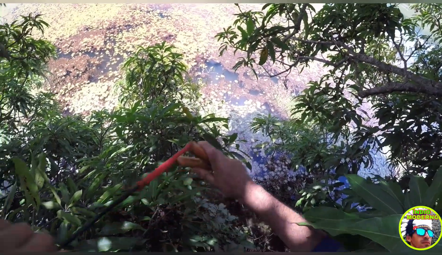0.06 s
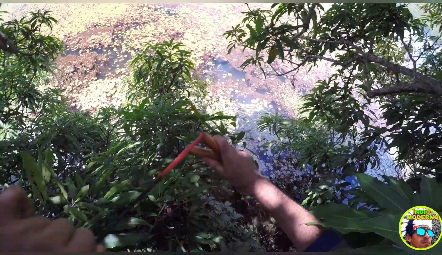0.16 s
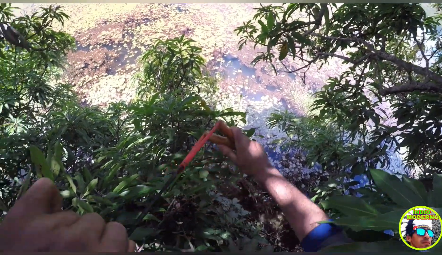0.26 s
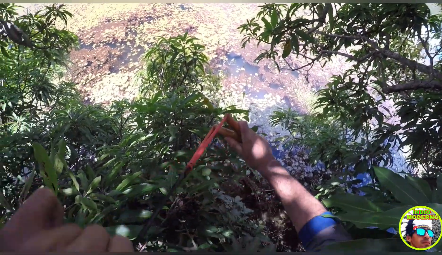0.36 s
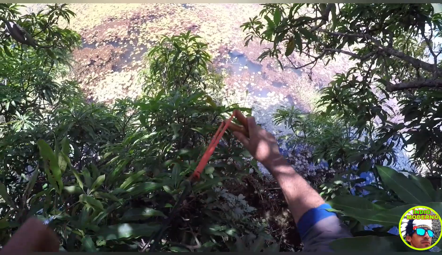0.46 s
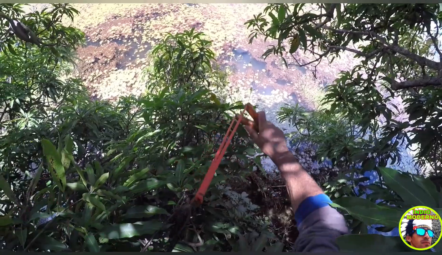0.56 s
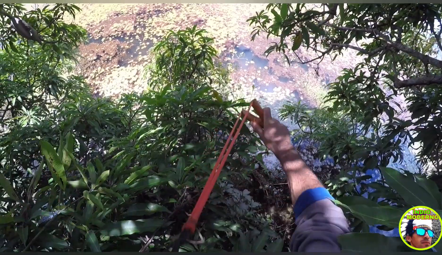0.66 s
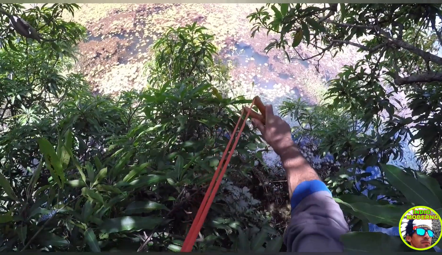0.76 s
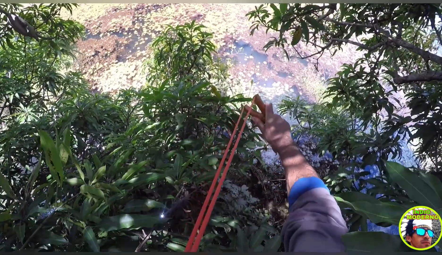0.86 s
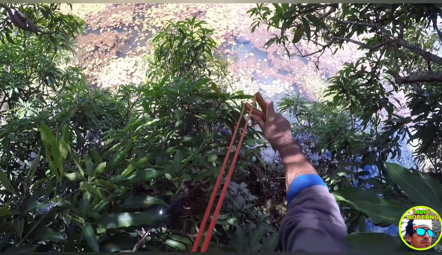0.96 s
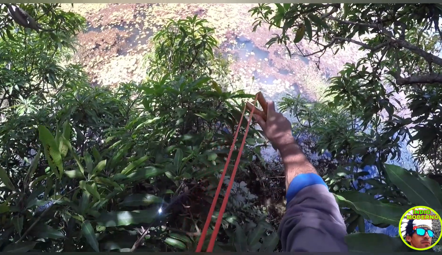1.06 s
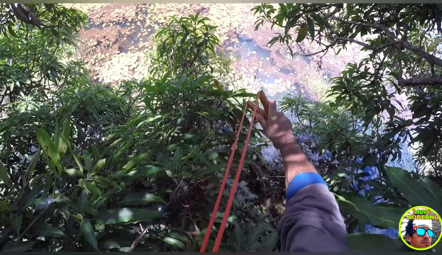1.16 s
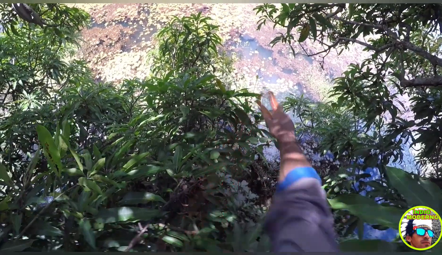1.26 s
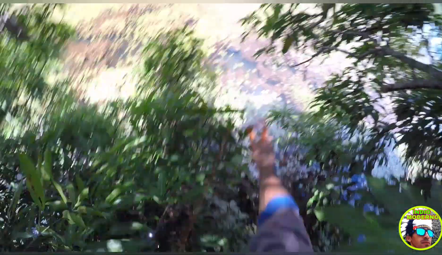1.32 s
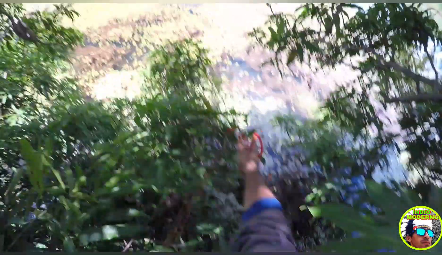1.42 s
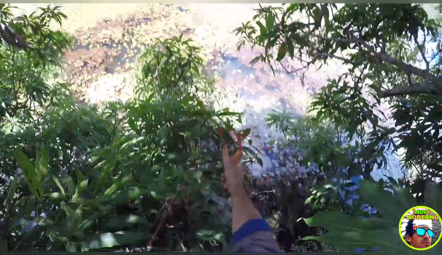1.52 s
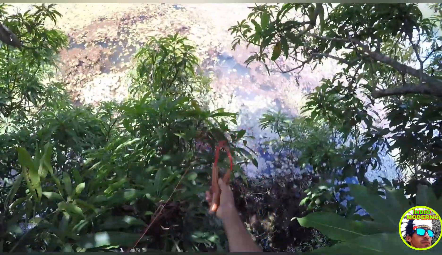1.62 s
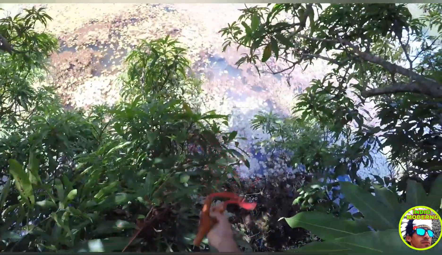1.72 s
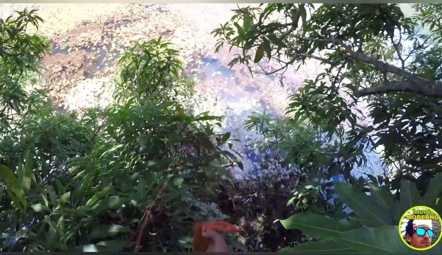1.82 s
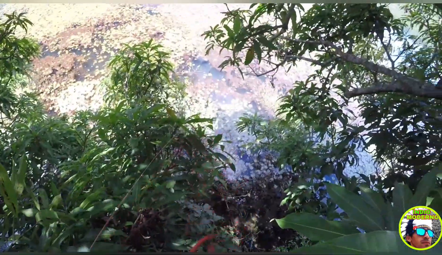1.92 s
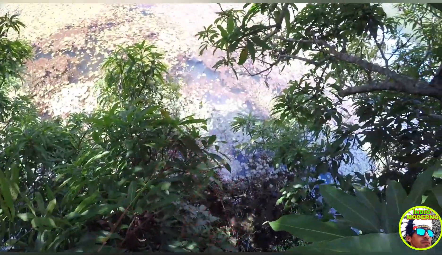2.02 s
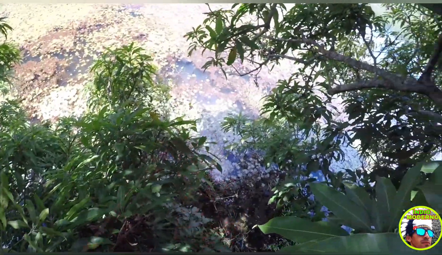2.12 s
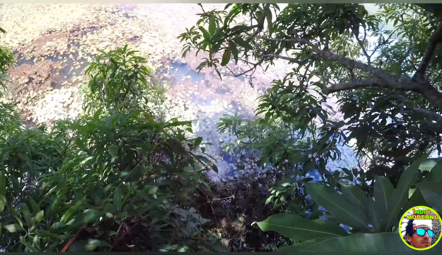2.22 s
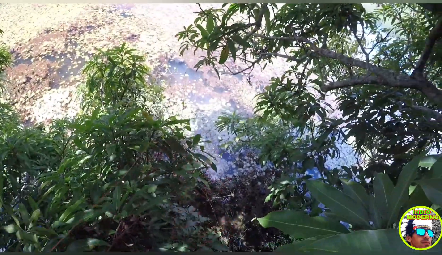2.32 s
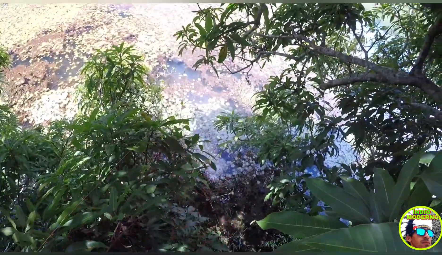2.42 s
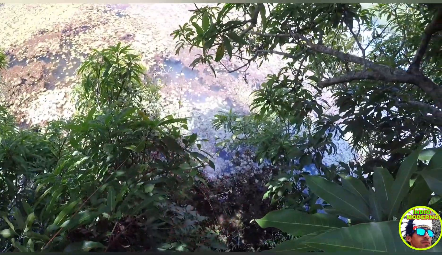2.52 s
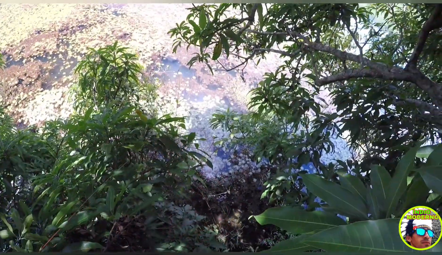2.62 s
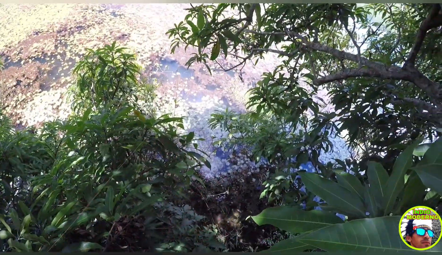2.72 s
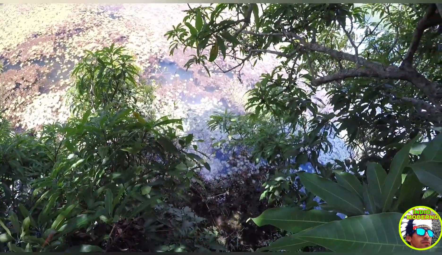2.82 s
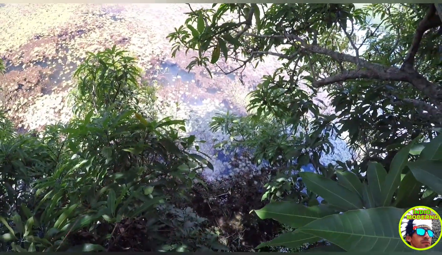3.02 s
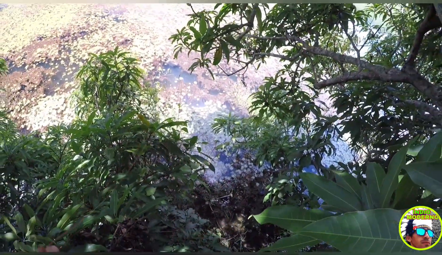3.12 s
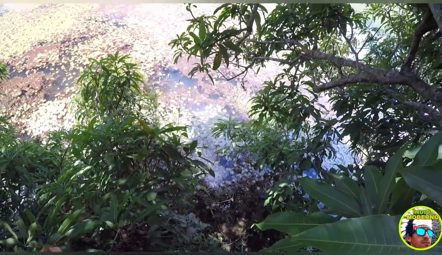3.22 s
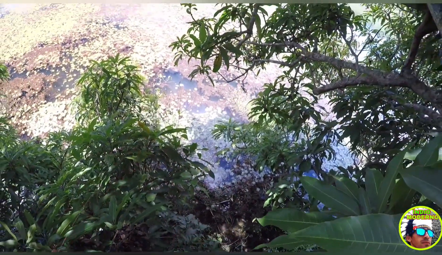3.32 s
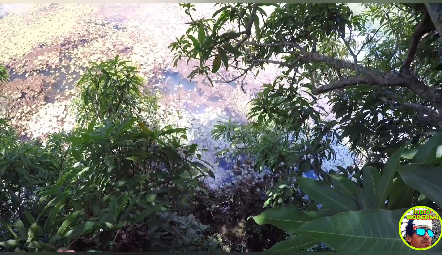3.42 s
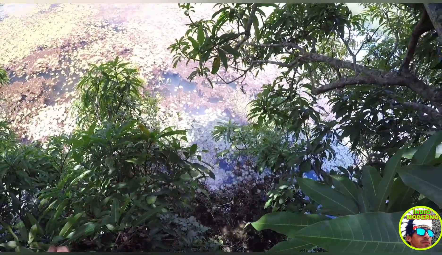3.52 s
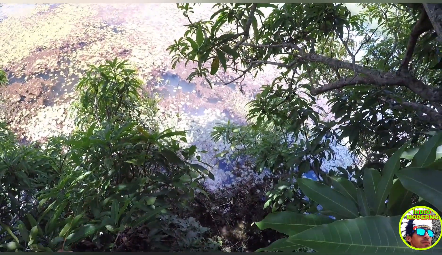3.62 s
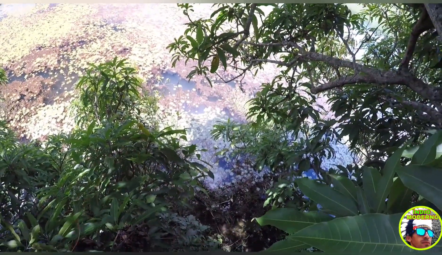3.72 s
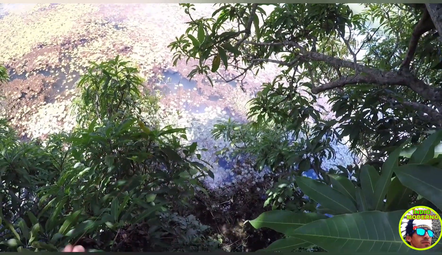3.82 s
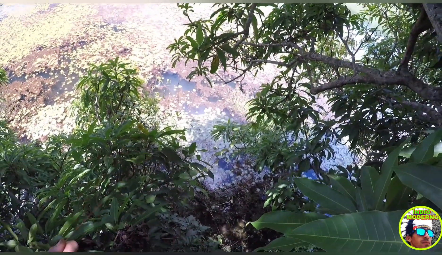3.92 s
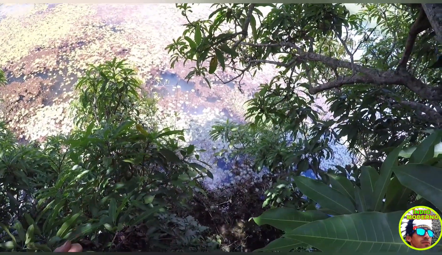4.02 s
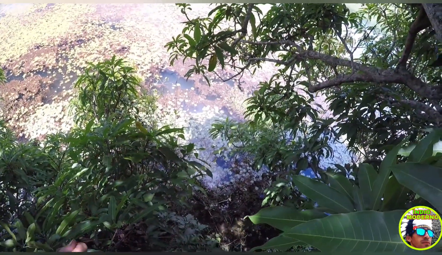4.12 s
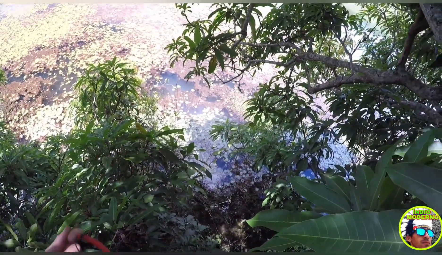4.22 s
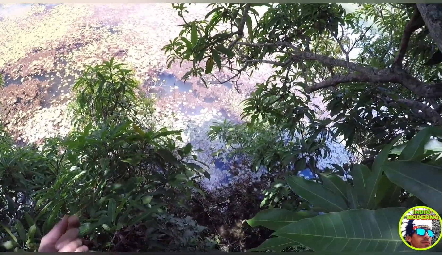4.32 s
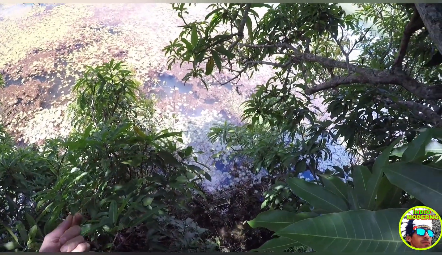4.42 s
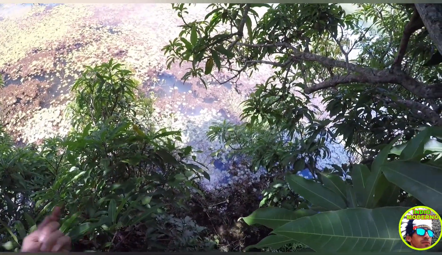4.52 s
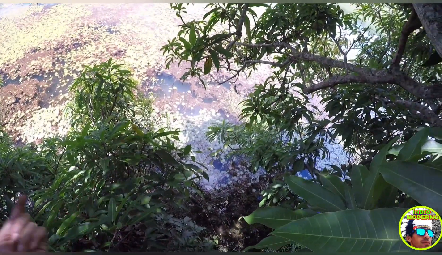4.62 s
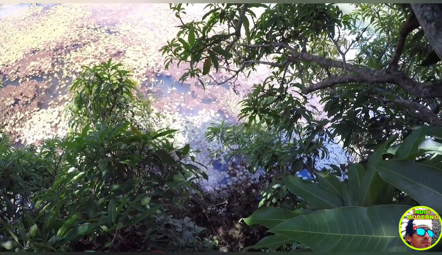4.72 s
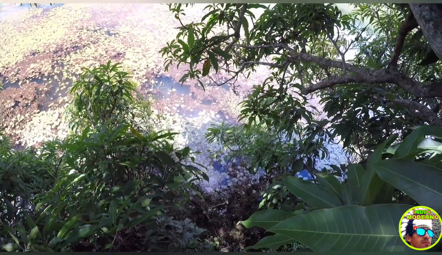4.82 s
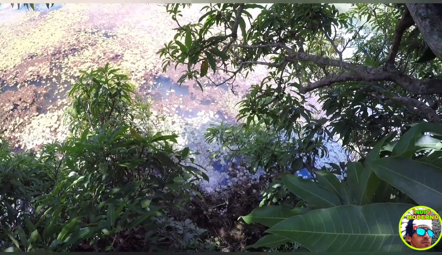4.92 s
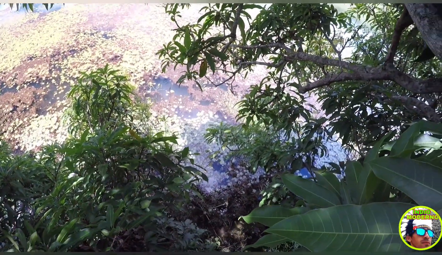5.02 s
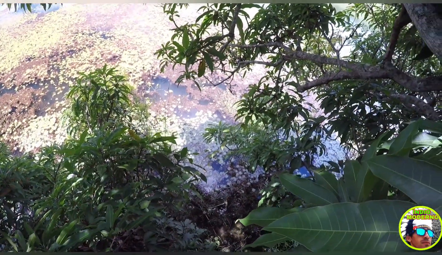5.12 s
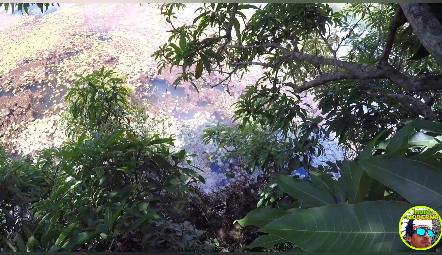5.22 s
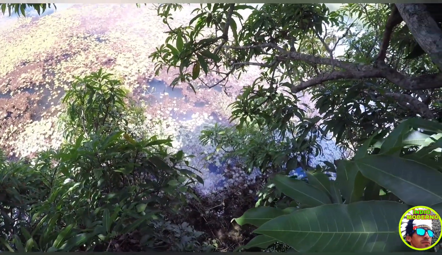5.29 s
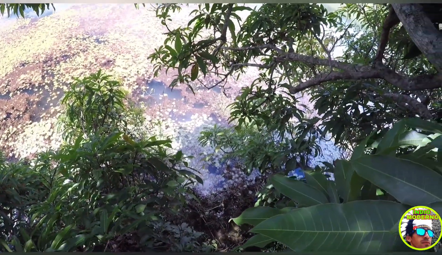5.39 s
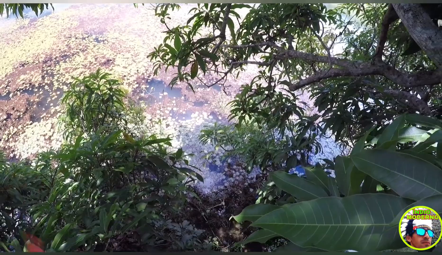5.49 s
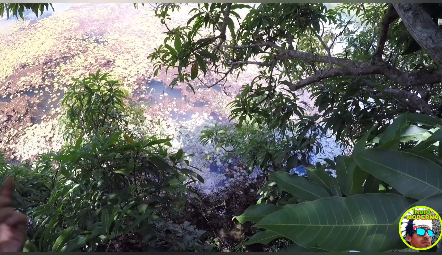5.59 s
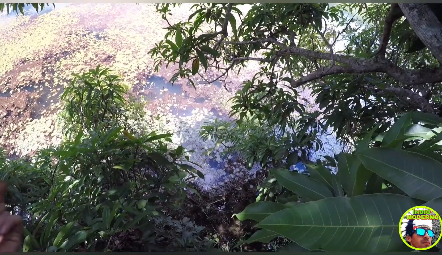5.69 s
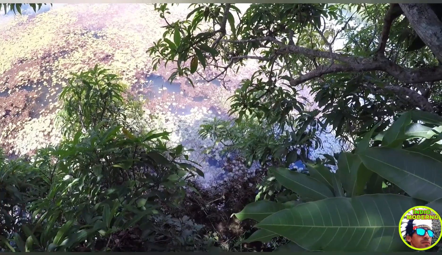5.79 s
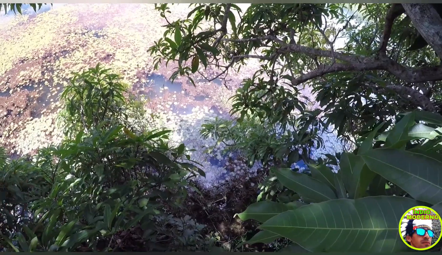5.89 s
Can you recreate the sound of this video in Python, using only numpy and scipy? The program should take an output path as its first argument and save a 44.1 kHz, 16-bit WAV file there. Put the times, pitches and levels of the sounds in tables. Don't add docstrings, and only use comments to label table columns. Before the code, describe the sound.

A near-silent pondside thicket: steady faint hiss, low wind rumble on a small head-worn microphone, a thin high insect band, tiny distant bird whistles and a far dove's soft falling coo at the start. At about 1.25 s a slingshot is released right beside it: a short rubbery rasp and hard ticks, then two violent slaps at 1.36 and 1.40 s, clipping, with deep mount jolts and a brief strap buzz, gone by 1.6 s. Sparse twiggy ticks come from 1.8 s, a brighter one at 2.16 s, with faint finger strokes. From 3.0 to 4.7 s fingers close by tap, pat, catch and rub hollow plastic, pouch and strap with buckle clicks, densest around 3.1-3.9 and 4.1-4.5 s; piercing near chirps sound around 3.0-3.3, 3.9, 4.05 and 4.6 s. Insects swell and a long low coo sounds near 4 s. After a lull, a final handling burst runs 5.35-5.75 s.

```python
import sys
import numpy as np
from scipy import signal
from scipy.io import wavfile
from scipy.ndimage import uniform_filter1d

SR = 44100
rng = np.random.default_rng(int(sys.argv[2]) if len(sys.argv) > 2 else 0)


def nominal_scale(level):
    x = np.asarray(level, float) / 20
    return 10 ** x


def materialize(psi):
    bounded = np.clip(np.atleast_2d(psi).T, -1, 1)
    quanta = np.round(bounded * 32767).astype(np.int16)
    wavfile.write(sys.argv[1], SR, quanta)


N = 262395

# f/Hz, width/Hz, level/dB
SHELL = [(1034, 170, 3), (1499, 1000, -8), (2500, 450, -13), (2907, 170, -6), (4020, 370, -8),
         (5125, 110, -3.5)]
# f/Hz, width/Hz, level/dB
HARD_PARTS = [(6300, 1200, 0.5), (7440, 900, 1), (8800, 900, -5), (11170, 500, -6), (13600, 600, -7),
              (14500, 800, -9.5)]


def evened(x):
    return x / np.sqrt(np.mean(x ** 2) + 1e-20)


def peaked(x):
    return x / abs(x).max()


def add(mix, s, sound):
    part = mix[round(s * SR):][:len(sound)]
    part += sound[:len(part)]


def resonate(x, hz, width):
    return signal.lfilter(*signal.iirpeak(min(hz, .45 * SR), hz / width, SR), x)


def slow(hz, width):
    return evened(resonate(resonate(rng.standard_normal(N), hz, width), hz, 2 * width))


def swells(rows, rise_s, fade_db_s):
    t = np.arange(N) / SR
    power = np.zeros(N)
    for s, length, db in rows:
        rise = np.clip((t - s) / rise_s, 0, 1)
        fade_db = fade_db_s * np.maximum(t - s - length, 0)
        power += (rise * nominal_scale(db - fade_db)) ** 2
    return np.sqrt(power)


def noise(spectrum, patchy_db):
    hz = np.fft.rfftfreq(2048, 1 / SR)
    f, db = np.transpose(spectrum)
    a, b, patches = rng.standard_normal((N // 512 + 5, 1025, 3)).T
    patches = uniform_filter1d(patches, size=20, axis=0)
    patches = evened(uniform_filter1d(patches, size=8, axis=1))
    shape_db = np.interp(np.log(hz + 1), np.log(f), db)[:, None] + patchy_db * patches
    sound = signal.istft((a + 1j * b) * nominal_scale(shape_db), nperseg=2048, noverlap=1536)[1]
    return evened(sound[:N])


def air():
    # f/Hz, density/dB per Hz
    air_spectrum = [(60, -5), (150, 3), (350, 0), (1200, -8), (6800, -12), (7500, -16.5), (11000, -22),
                    (15500, -22.5)]
    return nominal_scale(-62) * noise(air_spectrum, patchy_db=0.9)


def wind():
    # f/Hz, density/dB per Hz
    gust_spectrum = [(12, -10.5), (28, 3), (39, 5.5), (50, -2), (80, -9.5), (150, -23), (300, -30.5),
                     (500, -64)]
    # t/s, length/s, level/dB
    gusts = [
        (.3, 0.27, -58.5),
        (1.1, 0.13, -47.5),
        (1.95, 0.11, -48),
        (2.9, 1, -54.5),
        (5.2, 0.48, -51.5),
    ]
    level = np.hypot(nominal_scale(-52), swells(gusts, rise_s=0.26, fade_db_s=23.5))
    return level * noise(gust_spectrum, patchy_db=1.0)


def insects():
    # t/s, length/s, level/dB
    choruses = [
        (.08, 0.23, -73),
        (1.85, 1.6, -71),
        (3.6, 0.92, -64.5),
        (5.0, 0.15, -68.5),
        (5.6, 0.092, -68),
    ]
    chirr = resonate(resonate(rng.standard_normal(N), 6550, 520), 6550, 520)
    throb = 1 + .22 * slow(25, 25)
    level = np.hypot(nominal_scale(-74), swells(choruses, rise_s=0.043, fade_db_s=54))
    return level * evened(chirr * throb)


def dove():
    # t/s, length/s, start f/Hz, end f/Hz, level/dB
    coos = [
        (0.021, 0.25, 604, 591, -72.5),
        (.29, 0.11, 592, 495, -65.5),
        (3.93, 0.873, 448, 454, -62),
        (5.081, 0.17, 916, 990, -73),
    ]
    out = np.zeros(N)
    for s, length, start_hz, end_hz, db in coos:
        u = np.linspace(0, 1, round(length * SR))
        waver_hz = 4 * slow(6.3, 6)[:len(u)]
        hz = start_hz + (end_hz - start_hz) * u ** 1.62 + waver_hz
        note = np.sqrt(2) * np.sin(2 * np.pi * np.cumsum(hz) / SR)
        note = note * nominal_scale(1.5 * slow(8.9, 5.8)[:len(u)])
        add(out, s, nominal_scale(db) * note * np.sin(np.pi * u) ** 0.34)
    return out


def birds(rows, bend, fade_db, overtone_db, echo_db, t60):
    out = np.zeros(N)
    for s, length, start_hz, end_hz, db in rows:
        u = np.linspace(0, 1, round(length * SR))
        turns = np.cumsum(end_hz + (start_hz - end_hz) * (1 - u) ** bend) / SR
        note = np.sin(2 * np.pi * turns) + nominal_scale(overtone_db) * np.sin(4 * np.pi * turns)
        add(out, s, nominal_scale(db + fade_db * u) * note * signal.windows.tukey(len(u), .4))
    out = out * nominal_scale(3.5 * slow(60, 60))
    t = np.arange(SR // 2) / SR
    tail = rng.standard_normal(len(t)) * nominal_scale(-60 * t / t60)
    return out + nominal_scale(echo_db) * signal.fftconvolve(out, tail / np.linalg.norm(tail))[:N]


def far_birds():
    # t/s, length/s, start f/Hz, end f/Hz, level/dB
    far_notes = [(.145, 0.014, 2900, 2580, -61), (.185, 0.076, 6520, 5160, -66.5),
                 (.255, 0.038, 3990, 3430, -64), (.63, 0.041, 6850, 3630, -65.5),
                 (.79, 0.042, 6820, 3620, -64.5), (.895, 0.015, 2850, 2640, -62.5),
                 (1.13, 0.055, 7100, 3165, -61), (1.222, 0.023, 5900, 4030, -56),
                 (1.53, 0.049, 5500, 3780, -71), (1.66, 0.055, 6500, 3653, -70.5),
                 (1.815, 0.018, 2743, 2655, -63.5), (2.0, 0.089, 8040, 3844, -66.5),
                 (2.09, .026, 6970, 5640, -59.5), (2.125, 0.043, 6720, 3250, -54.5),
                 (2.43, 0.058, 8840, 4480, -63), (2.575, .04, 5070, 4970, -63),
                 (2.635, 0.054, 7420, 4600, -59.5), (2.69, 0.02, 4890, 4600, -52),
                 (2.83, 0.057, 5500, 3540, -64.5), (3.636, 0.052, 6300, 5080, -57),
                 (3.69, 0.043, 4350, 3760, -55), (4.9, 0.059, 6300, 5225, -62.5),
                 (4.962, 0.057, 5820, 3400, -57), (5.005, 0.045, 3600, 2560, -64)]
    return birds(far_notes, bend=1.4, fade_db=0, overtone_db=-41, echo_db=3, t60=.3)


def near_birds():
    # t/s, length/s, start f/Hz, end f/Hz, level/dB
    near_notes = [(2.975, 0.026, 7270, 7270, -38.5), (2.992, 0.0037, 7200, 5890, -36),
                  (2.997, 0.021, 6060, 6000, -36), (3.105, 0.014, 6230, 4700, -54),
                  (3.115, 0.01, 5100, 5300, -37.5), (3.124, 0.0092, 5180, 5680, -34),
                  (3.134, 0.0184, 5640, 6060, -34), (3.152, 0.01, 6110, 5540, -35.5),
                  (3.324, 0.013, 7000, 7200, -44), (3.332, 0.015, 6960, 6770, -35.5),
                  (3.888, 0.019, 6230, 5280, -32), (4.053, 0.018, 6600, 6020, -36.5),
                  (4.577, 0.016, 6720, 5550, -38), (4.594, .012, 5600, 5500, -47)]
    return birds(near_notes, bend=1.15, fade_db=-2, overtone_db=-21.5, echo_db=-7, t60=0.1)


def treble(x, tilt_db):
    out = 0
    for (hz, width, db), tilt in zip(HARD_PARTS, tilt_db):
        out = out + nominal_scale(db + tilt) * resonate(resonate(x, hz, width), hz, 3 * width)
    return out


def case(x, tilt_db):
    out = 0
    for (hz, width, db), tilt in zip(SHELL, tilt_db):
        out = out + nominal_scale(db + tilt) * resonate(resonate(x, hz, width), hz, 6 * width)
    return out


def dull(x):
    return signal.sosfilt(signal.butter(2, [480, 5600], "band", fs=SR, output="sos"), x)


def ticks(rows, shell_db, sharpness, crack_db):
    out, t = np.zeros(N), np.arange(2600) / SR
    for s, db, hz, treble_db, t60 in rows:
        shape = nominal_scale(-60 * t / t60) + nominal_scale(crack_db - 60 * t / .004)
        scratch = rng.standard_normal(len(t)) * shape * (1 - np.exp(-t / 2e-4))
        scratch[9] += nominal_scale(crack_db + 7.0)
        width = hz / sharpness
        own = resonate(resonate(scratch, hz, width), hz, 1.2 * width)
        shell = case(scratch, 3 * rng.standard_normal(len(SHELL)))
        spit = treble(scratch, 4.0 * rng.standard_normal(len(HARD_PARTS)))
        shell_gain = nominal_scale(shell_db - 4.2 * np.log2(hz / 1000))
        ring = dull(peaked(own) + shell_gain * peaked(shell))
        add(out, s, nominal_scale(db) * (peaked(ring) + nominal_scale(min(treble_db, 0)) * peaked(spit)))
    return out


def touches(rows, hz, sheen_db):
    return [(s, db, hz * (1 + 0.018 * rng.standard_normal()), sheen_db, t60) for s, db, t60 in rows]


def rubbing(level, sheen_db, per_s, spread_db, smooth, clump_db, broad, shift_db, high_db):
    sizes = nominal_scale(spread_db * np.minimum(rng.exponential(1, N), 3))
    slips = sizes * (rng.random(N) < per_s / SR)
    grit = evened(signal.lfilter([1], [1, -.988], slips)) + smooth
    grit = grit * nominal_scale(clump_db * slow(33, 41)) * rng.standard_normal(N)
    tilt_db = [shift_db * slow(8.2, 7.1) + high_db * (hz > 3500) for hz, _, _ in SHELL]
    shell = evened(case(grit, tilt_db))
    body = evened(dull(shell + broad * evened(resonate(grit, 2100, 3000))))
    top = evened(treble(grit, np.zeros(len(HARD_PARTS))))
    return level * (body + nominal_scale(sheen_db) * top)


def twigs():
    # t/s, peak/dB, ring f/Hz, relative treble/dB, t60/s
    twig_ticks = [(0.439, -46.5, 1740, -17, 0.038), (1.846, -44.5, 2080, -24, 0.041),
                  (1.878, -34.5, 2270, -11.5, 0.01), (1.879, -37.5, 704, -34, 0.039),
                  (2.161, -25, 3390, -1.5, 0.078), (2.198, -35, 3940, -5.5, 0.025),
                  (2.232, -36, 4050, -22, 0.032), (2.238, -47, 4000, -17, .012),
                  (2.247, -37.5, 3500, -23, .015), (2.32, -45, 2500, -14, 0.018),
                  (2.285, -33, 2230, -7, 0.011), (2.491, -37, 3670, -5.5, 0.037),
                  (2.774, -42, 1690, -22, 0.11), (2.803, -40.5, 1390, -5, 0.055),
                  (3.128, -29, 1770, -18, 0.025), (3.139, -30, 4500, 5, 0.011),
                  (3.164, -37, 2000, -20, .015), (3.349, -48, 4840, -1, .008),
                  (4.221, -29.5, 1520, -21, 0.018), (4.337, -30.5, 1580, -3.5, 0.018),
                  (5.54, -32.5, 4000, -6.5, .015), (3.269, -40, 1690, 1, 0.043),
                  (4.64, -41.5, 1000, -27, 0.032), (4.843, -47.5, 918, -26, 0.017),
                  (5.225, -47, 900, -30, .03), (5.281, -37, 2600, -20, 0.016),
                  (5.495, -23.5, 4400, -34, 0.025), (5.351, -42, 2500, -25, 0.0099),
                  (5.516, -47, 1484, -27, 0.01), (5.71, -49, 2920, -25, 0.023),
                  (3.514, -36, 1600, -23, 0.055), (2.0, -51, 950, -31, .02), (2.565, -40.5, 5000, 1, 0.02),
                  (4.596, -44, 2500, -19, 0.033), (2.449, -38.5, 2500, -11.5, .015),
                  (5.776, -46, 926, -26, 0.042)]
    return ticks(twig_ticks, shell_db=-7.5, sharpness=0.85, crack_db=5)


def buckle():
    # t/s, peak/dB, t60/s
    clicks = [(1.7881, -43, 0.027), (2.5641, -43, 0.031), (2.6952, -42.5, 0.032), (2.9217, -43.5, 0.052),
              (3.031, -41.5, 0.018), (3.08, -44, 0.13), (3.136, -38, .03), (3.1439, -28.5, 0.037),
              (3.203, -42, .025), (3.253, -35, 0.021), (3.2813, -42, 0.022), (3.292, -43, .025),
              (3.308, -49, .04), (3.3407, -31, 0.015), (3.4064, -34.5, 0.023), (3.5905, -29, 0.048),
              (3.9114, -36.5, 0.064), (5.4236, -43, 0.034), (5.4838, -39, 0.075), (5.552, -33, 0.028),
              (5.5925, -43, 0.047)]
    return ticks(touches(clicks, hz=2980, sheen_db=-30), shell_db=-8, sharpness=2.7, crack_db=2)


def strokes():
    # t/s, length/s, level/dB
    finger_strokes = [(2.16, 0.14, -62), (2.27, 0.011, -62), (2.55, 0.22, -59), (2.73, 0.1, -57.5),
                      (2.85, 0.52, -60.5), (3.11, 0.065, -44.5), (3.19, 0.024, -48), (3.24, 0.078, -53.5),
                      (3.4, 0.088, -50), (3.49, .11, -48.5), (3.63, 0.33, -52.5), (3.78, 0.23, -51.5),
                      (4.08, 0.04, -46), (4.18, 0.13, -50.5), (4.34, 0.055, -46), (4.43, 0.045, -48),
                      (5.375, 0.047, -46), (5.47, 0.038, -49), (5.52, 0.07, -50), (5.575, 0.054, -46.5),
                      (5.66, 0.13, -62.5)]
    level = swells(finger_strokes, rise_s=0.01, fade_db_s=261)
    return rubbing(level, sheen_db=-16, per_s=420, spread_db=3.5, smooth=.35, clump_db=0.3,
                   broad=0.23, shift_db=3.5, high_db=-1.5)


def fingertips():
    # t/s, peak/dB, t60/s
    taps = [(2.456, -44.5, 0.072), (2.531, -41, 0.053), (2.713, -48.5, 0.045), (2.89, -40, 0.036),
            (3.127, -39, 0.056), (3.201, -35, 0.033), (3.311, -36.5, 0.037), (3.396, -35, 0.067),
            (3.433, -41, 0.027), (3.468, -38, 0.076), (3.498, -43, 0.033), (3.686, -28.5, 0.014),
            (3.715, -30, 0.022), (4.065, -29, 0.054), (4.097, -36, 0.038), (4.174, -33, 0.025),
            (4.198, -43, 0.039), (4.22, -27.5, 0.049), (4.24, -34, 0.033), (4.29, -27, 0.039),
            (4.326, -36, 0.12), (4.336, -24, 0.037), (4.366, -23.5, 0.023), (4.427, -32, 0.02),
            (4.449, -42, 0.032), (4.472, -34.5, 0.022), (4.657, -40.5, 0.055), (5.359, -43, 0.021),
            (5.576, -35, 0.041), (5.662, -42, 0.038)]
    # t/s, peak/dB, t60/s
    catches = [
        (2.119, -46, 0.049),
        (2.275, -40.5, 0.045),
        (3.178, -25, 0.029),
        (3.248, -38, 0.042),
        (3.532, -33, 0.062),
        (3.768, -28.5, 0.11),
        (3.843, -28, 0.075),
        (5.389, -37.5, 0.012),
        (5.534, -30, 0.08),
    ]
    # t/s, peak/dB, t60/s
    pats = [(3.065, -44.5, 0.032), (3.083, -40.5, 0.03), (3.144, -39.5, 0.03), (3.167, -29.5, 0.037),
            (3.178, -50, 0.044), (3.219, -41, 0.03), (3.254, -38, 0.03), (3.331, -36, 0.028),
            (3.57, -38, 0.023), (3.732, -41, 0.03), (3.89, -37, 0.037), (3.945, -44.5, 0.03),
            (3.974, -40, 0.037), (4.309, -37, 0.033), (4.354, -28, 0.019), (4.379, -31, 0.02),
            (4.394, -35, 0.028), (4.492, -44.5, 0.027), (5.397, -38, 0.05), (5.439, -35.5, 0.035),
            (5.49, -36.5, 0.027), (5.551, -39, 0.03), (5.609, -34, 0.026), (5.627, -44, 0.03),
            (5.684, -46, 0.03), (5.742, -54, 0.03)]
    rows = touches(taps, hz=1086, sheen_db=-13.5)
    rows += touches(catches, hz=1053, sheen_db=-6)
    rows += touches(pats, hz=1086, sheen_db=-25)
    return ticks(rows, shell_db=6.5, sharpness=2.21, crack_db=10)


def strap():
    # t/s, length/s, level/dB
    buzzes = [
        (1.255, .015, -45.5),
        (1.28, .06, -47),
        (1.44, 0.054, -59.5),
        (1.51, .02, -59.5),
        (1.58, 0.037, -71.5),
        (5.4, 0.016, -51.5),
        (5.585, 0.018, -46),
    ]
    return swells(buzzes, rise_s=0.011, fade_db_s=250) * slow(3020, 170)


def rasp():
    # t/s, length/s, level/dB
    passes = [
        (1.24, .01, -50),
        (1.256, .016, -37.5),
        (1.276, .02, -30),
        (1.296, .028, -33),
        (1.328, .024, -39),
        (1.356, .01, -37),
        (1.378, .018, -43),
        (1.405, .04, -50),
    ]
    return rubbing(swells(passes, rise_s=0.012, fade_db_s=450), sheen_db=-13, per_s=1100, spread_db=2.5,
                   smooth=1.1, clump_db=1.5, broad=1.6, shift_db=.7, high_db=-7)


def whip():
    # t/s, peak/dB, ring f/Hz, relative treble/dB, t60/s
    whip_ticks = [(1.2528, -27, 2010, -14, 0.05), (1.2757, -9, 2830, -13.5, 0.014),
                  (1.2762, -11, 1500, -9, .01), (1.2785, -15.5, 1170, -14, 0.0094),
                  (1.2810, -15, 1420, -27.5, 0.039), (1.3005, -22, 3120, -16, .011),
                  (1.3102, -12, 3500, -15.5, 0.02), (1.3110, -14.5, 814, -24.5, 0.018),
                  (1.3535, -27, 5400, -4, 0.025), (1.3572, -1, 4094, -10.5, 0.017),
                  (1.3905, -23.5, 1800, -24, .03), (1.3965, -9, 2900, -30.5, .012),
                  (1.3975, -5, 1067, -31.5, 0.015), (1.4005, -16.5, 1716, -32, .009),
                  (1.4390, -28.5, 2260, -16, 0.015)]
    return ticks(whip_ticks, shell_db=-16, sharpness=1.5, crack_db=6)


def jolts():
    # t/s, level/dB, f/Hz, t60/s, direction
    mount_jolts = [(1.2531, -23, 270, .012, -1), (1.2757, -22, 420, .03, -1), (1.3105, -27, 500, .025, 1),
                   (1.3637, -2, 110, .066, 1), (1.365, -11, 333.4, .03, -1), (1.368, -9, 75, .03, -1),
                   (1.373, -9.5, 30, .09, 1), (1.3866, -6, 165, .026, 1), (1.3888, -1, 140, .022, -1),
                   (1.4014, 3, 102.1, .022, -1), (1.406, -11, 21, .23, 1), (1.441, -34, 250, .04, -1),
                   (1.45, -28, 58, .25, 1), (1.49, -41, 130, .15, 1), (2.41, -40, 75, .2, 1)]
    # t/s, level/dB, f/Hz, t60/s, direction
    more_jolts = [
        (1.258, -30.5, 46, .25, 1),
        (1.262, -31, 98, .15, 1),
        (1.276, -19, 660, .03, 1),
        (1.305, -27.5, 18, .3, 1),
        (1.415, -30.5, 58, .25, 1),
        (1.445, -36.5, 180, .2, 1),
    ]
    out, t = np.zeros(N), np.arange(SR // 3) / SR
    for s, db, hz, t60, way in [*mount_jolts, *more_jolts]:
        swing = np.sin(2 * np.pi * hz * t) * (1 - np.exp(-t * hz * 12))
        add(out, s, way * nominal_scale(db - 60 * t / t60) * swing)
    return out


def slaps():
    # t/s, peak before overload/dB, settled f/Hz, t60/s, direction
    rubber_slaps = [
        (1.3575, 5, 1370, .012, 1),
        (1.363, -1, 1100, .007, 1),
        (1.3963, 9, 390, .019, -1),
        (1.3975, -6, 1050, .014, 1),
    ]
    out, t = np.zeros(N), np.arange(SR // 3) / SR
    for s, db, hz, t60, way in rubber_slaps:
        extra = .13 + .113 * nominal_scale(db) ** 2
        slack_s = 0.00046 * extra ** 2
        turns = hz * t + extra * (1 - np.exp(-t / slack_s))
        ring = np.sin(2 * np.pi * turns) * (1 - np.exp(-t / 0.00014))
        add(out, s, way * nominal_scale(db - 60 * t / t60) * ring)
    return out


def scene():
    background = air() + wind() + insects() + dove() + far_birds() + near_birds()
    fingers = twigs() + buckle() + strokes() + fingertips()
    release = strap() + rasp() + whip() + jolts() + slaps()
    return np.tile(background + fingers + release, (2, 1))


def roll_off(x):
    return signal.sosfilt(signal.butter(12, 16520, fs=SR, output="sos"), x)


def record(dry):
    # t/s, end/s, lowest f/Hz, level/dB
    apart = [(0, .15, 10900, -18), (1.257, 1.283, 5240, -11), (1.353, 1.389, 6260, -14),
             (2.167, 2.58, 9720, -13), (2.221, 2.263, 4650, -10), (3.756, 3.982, 7100, -13),
             (4.059, 4.186, 5450, -17), (4.267, 4.355, 4900, -13), (4.91, 4.947, 5490, -11),
             (5.263, 5.952, 9200, -11), (5.383, 5.555, 4960, -18)]
    ceiling = .97
    clipped = dry / (1 + abs(dry / ceiling) ** 4) ** (1 / 4)
    flutter = evened(uniform_filter1d(rng.standard_normal(N), size=60))
    scrambled = clipped[0] * flutter
    side = np.zeros(N)
    for s, end, hz, db in apart:
        span = slice(round(s * SR), round(end * SR))
        high = signal.butter(8, hz, "high", fs=SR, output="sos")
        add(side, s, nominal_scale(db) * signal.sosfilt(high, scrambled[span]))
    pair = clipped + [side, -side]
    pair = signal.oaconvolve(pair, signal.firwin(255, 15300, fs=SR)[None], "same")
    return roll_off(pair)


dry = scene()
out = record(dry)
materialize(out)
```